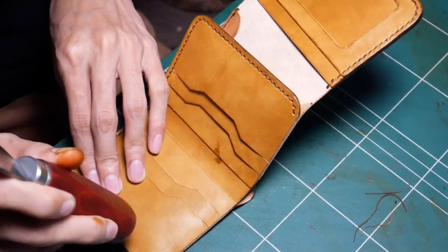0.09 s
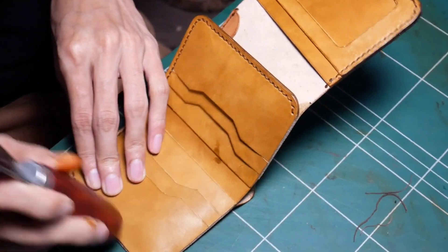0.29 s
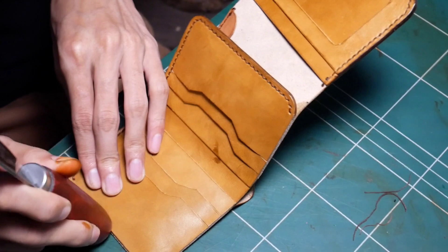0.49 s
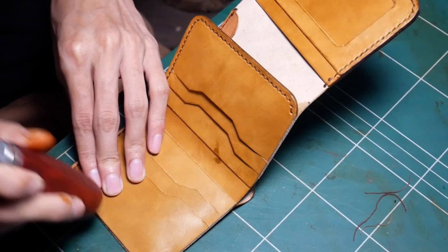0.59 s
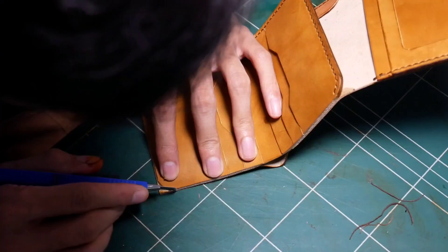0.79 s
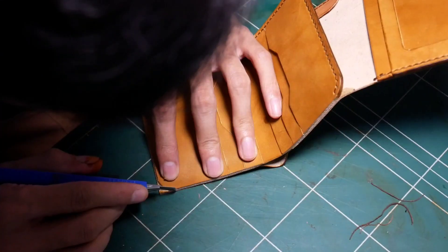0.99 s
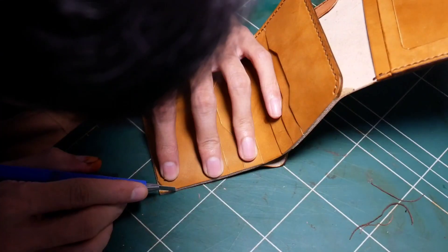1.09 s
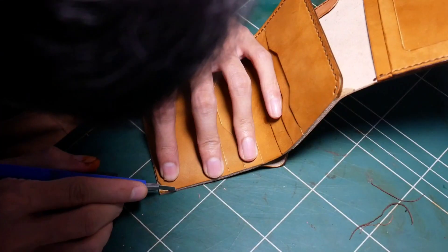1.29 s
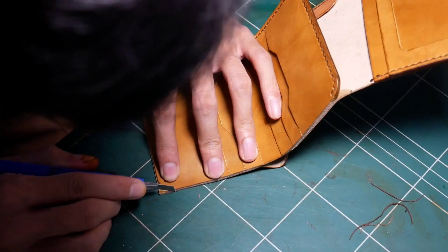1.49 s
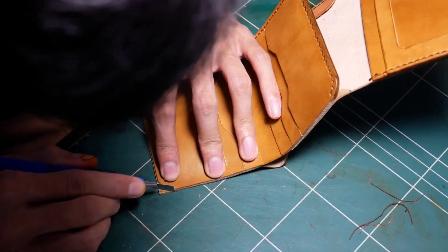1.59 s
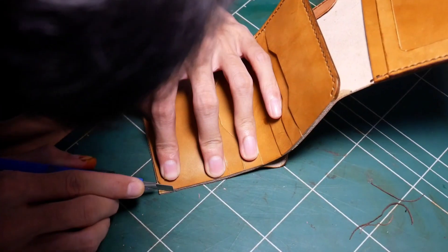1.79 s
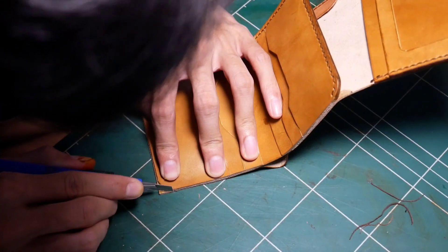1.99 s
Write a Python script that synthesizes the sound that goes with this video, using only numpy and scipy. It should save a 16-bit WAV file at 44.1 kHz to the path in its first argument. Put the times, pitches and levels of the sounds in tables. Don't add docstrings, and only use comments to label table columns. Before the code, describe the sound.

Heavy mallet knocks on a leather-covered bench, cut abruptly to faint edge-tool ticks and soft rubbing.

```python
import sys
import numpy as np
from scipy import signal
from scipy.io import wavfile

SR = 44100
rng = np.random.default_rng(int(sys.argv[2]) if len(sys.argv) > 2 else 0)


def dump_mix(stems):
    frames = np.atleast_2d(stems).T
    limited = np.clip(frames, -1, 1)
    pcm = np.round(limited * 32767).astype(np.int16)
    wavfile.write(sys.argv[1], SR, pcm)


def level_to_linear(level):
    exponent = np.asarray(level, float) / 20
    return 10 ** exponent


N = 88200
T = np.arange(N) / SR
SIDES = np.array([[1], [-1]])

# start in seconds, level in dB, tick pitch in Hz, tick level in dB, rattle in dB.
MALLET_BLOWS = [
    (-.064, -7.5, 2600, -12, -33),
    (0.2051, -6.5, 2700, -10, -33.5),
    (0.4727, -6, 1910, -14.5, -25.5),
]
# pitch in Hz, strength left, strength right, T60 in seconds.
HEAD_MODES = [(296.0, 1.42, 0.464, 0.025), (601.8, 0.372, 0.205, 0.07), (202.3, 0.396, 0.626, 0.07),
              (1244.0, -0.022, -0.056, 0.07), (955.3, -0.057, 0.03, 0.07), (416.0, -0.696, -0.297, 0.028)]
# frequency in Hz, likeness from 0 to 1.
BLOW_LIKENESS = [(60, 0.69), (180, 1), (550, 0.44), (1650, 0.64), (4970, 1), (15000, 0.22)]
AIR_LIKENESS = [(60, 0.26), (180, 0.13), (550, 0.02), (1650, 0.29), (4970, 1), (15000, 0.057)]
# frequency in Hz, left minus right in dB.
ROOM_LEAN = [(60, -4), (150, 2), (380, 4), (950, 0), (2380, -0.5), (5980, -4), (15000, -5)]
HEAD_GLIDE_CYCLES = 0.516
TICK_LEAD_S = 0.0005
RATTLE_LAG_S, RATTLE_RISE_S = 0.0079, 0.0019


def rms_one(x):
    return x / np.sqrt(np.mean(x ** 2) + 1e-20)


def at_hz(points, hz):
    table_hz, value = np.transpose(points)
    return np.interp(np.log(hz), np.log(table_hz), value)


def lean(hz):
    return at_hz(ROOM_LEAN, hz) / 2 * SIDES


def drift(rate):
    r = np.exp(-80 * np.pi * rate / SR)
    slow = signal.lfilter([1], [1, -2 * r, r * r], rng.standard_normal(N // 40 + 2002))[2000:]
    return np.interp(np.arange(N) / 40, np.arange(len(slow)), rms_one(slow))


def band_filter(order, low_hz, high_hz, x):
    return signal.sosfilt(signal.butter(order, [low_hz, high_hz], "band", fs=SR, output="sos"), x)


def high_pass(hz, x):
    return signal.sosfilt(signal.butter(2, hz, "high", fs=SR, output="sos"), x)


def bands(spectrum, likeness):
    edges = 28 * 2 ** np.arange(0, 9.3, .4)
    white = rng.standard_normal((2, 2, N + 4000))
    out = []
    for k, (low, high) in enumerate(zip(edges, edges[1:])):
        mid, side = band_filter(2, low, high, white[k % 2])[:, 4000:]
        hz = np.sqrt(low * high)
        alike = np.clip(at_hz(likeness, hz), 0, 1)
        stereo = np.sqrt(1 + alike) * mid + np.sqrt(1 - alike) * side * SIDES
        out.append((hz, level_to_linear(at_hz(spectrum, hz)) * stereo))
    total = np.sqrt(sum(np.mean(b ** 2) for _, b in out))
    return [(hz, b / total) for hz, b in out]


def resonant(hz, width):
    r = np.exp(-np.pi * width / SR)
    poles = [1, -2 * r * np.cos(2 * np.pi * hz / SR), r * r]
    mid, side = signal.lfilter([1, 0, -1], poles, rng.standard_normal((2, N)))
    return rms_one(mid + 1.01 * side * SIDES)


def steep_band(low_hz, high_hz, db):
    mid, side = band_filter(5, low_hz, high_hz, rng.standard_normal((2, N)))
    return level_to_linear(db) * rms_one(mid + 1.17 * side * SIDES)


def swell(s, rise, fall):
    u = np.maximum(T - s, 0)
    return (1 - np.exp(-u / rise)) * np.exp(-u / fall)


def wavelet(s, hz, width):
    return np.exp(-.5 * ((T - s) / width) ** 2) * np.cos(2 * np.pi * hz * (T - s))


def modes(s, table, rise_cycles, glide_cycles, tilt_db):
    longest_s = 0.31
    u = np.maximum(T - s, 0)
    out = 0
    for hz, left, right, t60 in table:
        turn = 2 * np.pi * (hz * u + glide_cycles * (1 - np.exp(-u / 0.00044)))
        grow = 1 - np.exp(-u * hz / rise_cycles)
        decay = level_to_linear(tilt_db * np.log2(hz / 300) - 60 * u / min(t60, longest_s))
        out = out + np.array([[left], [right]]) * (decay * grow * np.sin(turn))
    return out


def mallet_and_bench():
    # pitch in Hz, strength left, strength right, T60 in seconds.
    bench_modes = [(123.0, -0.12, -0.156, 0.372), (190.4, 0.113, 0.117, 0.173),
                   (218.2, -0.113, -0.124, 0.304), (242.5, -0.137, -0.114, 0.199),
                   (277.1, 0.116, 0.152, 0.268), (325.3, 0.433, 0.24, 0.08), (350.9, 0.186, 0.242, 0.247),
                   (391.8, 0.06, 0.024, 0.257), (452.2, 0.127, 0.09, 0.226), (482.8, 0.229, 0.01, 0.08),
                   (610.1, 0.154, 0.11, 0.159), (684.7, 0.155, 0.062, 0.08), (799.4, 0.05, 0.013, 0.182),
                   (949.8, -0.008, -0.002, 0.6)]
    tilts = [
        1.5,
        -0.14,
        -0.9,
    ]
    rings = [
        -6.5,
        0.9,
        0.7,
    ]
    contact_hz, bounce_s, bounce_db = 1620, 0.01024, -12.7
    out = 0
    for (s, db, tick_hz, tick_db, _), tilt_db, ring_db in zip(MALLET_BLOWS, tilts, rings):
        knock = modes(s, HEAD_MODES, 0.033, HEAD_GLIDE_CYCLES, 0)
        bounce = modes(s + bounce_s, HEAD_MODES, 0.05, HEAD_GLIDE_CYCLES, 0)
        ring = modes(s, bench_modes, 0.2, 0, tilt_db)
        struck = knock - level_to_linear(bounce_db) * bounce + ring
        soft = signal.lfilter(*signal.butter(1, contact_hz, fs=SR), struck)
        tick = level_to_linear(tick_db) * wavelet(s - TICK_LEAD_S, tick_hz, width=0.0005)
        out = out + level_to_linear(db + 6.5 + ring_db) * soft + tick
    return out


def contact_crack():
    snap = sum(swell(s - 2 * TICK_LEAD_S, rise=0.00019, fall=0.00073) for s, *_ in MALLET_BLOWS)
    return steep_band(940, 5900, db=-22) * snap


def room_tail():
    # frequency in Hz, level in dB per Hz.
    tail_spectrum = [(24, -72), (40, -36), (103, -10), (359, -2.5), (1080, -20), (2060, -20.5), (7520, -55),
                     (14000, -59.5), (15500, -54)]
    # frequency in Hz, T60 in seconds.
    tail_t60 = [(60, 0.74), (200, 0.3), (600, 0.47), (2000, 0.43), (6000, 0.68), (12000, 0.77)]
    early_db, early_s, early_from_hz = 17.5, 0.0054, 1700
    out = 0
    for hz, noise in bands(tail_spectrum, BLOW_LIKENESS):
        fall = at_hz(tail_t60, hz) / np.log(1000)
        rise = 0.0018 + 1.6 / hz
        early = level_to_linear(early_db) / (1 + (early_from_hz / hz) ** 4)
        shape = 0
        for s, db, *_ in MALLET_BLOWS:
            shape = shape + level_to_linear(db + 9) * (swell(s, rise, fall) + early * swell(s, rise, early_s))
        out = out + level_to_linear(-24 + lean(hz) + 2.9 * drift(29)) * shape * noise
    return out


def ringing_resonances():
    # pitch in Hz, width in Hz, level in dB, T60 in seconds.
    resonance_modes = [(192.3, 5.9, -35, 0.57), (469, 47, -34.5, 0.62), (6820, 160, -37, 0.1),
                       (7230, 320, -45, 0.47), (4000, 700, -40.5, 0.092), (8660, 820, -51.5, 0.42),
                       (2300, 130, -63, 0.32), (1970, 110, -55, 0.77), (2700, 85, -51.5, 0.31),
                       (3400, 130, -59, 0.17), (3756, 54, -51, 0.44), (11900, 450, -62, 0.16)]
    out = 0
    for hz, width, db, t60 in resonance_modes:
        fall = t60 / np.log(1000)
        shape = sum(level_to_linear(db + blow_db + 8.5) * swell(s + RATTLE_LAG_S, RATTLE_RISE_S, fall)
                    for s, blow_db, *_ in MALLET_BLOWS)
        out = out + resonant(hz, width) * shape
    return out


def tool_rattle():
    # frequency in Hz, level in dB per Hz.
    rattle_spectrum = [(1180, -38), (2000, 10.5), (4090, 8), (5980, -64), (6930, -9), (11500, 1.5),
                       (14500, -9), (15700, -37)]
    shaken = sum(level_to_linear(db + 5) * swell(s + RATTLE_LAG_S, RATTLE_RISE_S, fall=0.012)
                 for s, *_, db in MALLET_BLOWS)
    noise = sum(level_to_linear(lean(hz)) * b for hz, b in bands(rattle_spectrum, BLOW_LIKENESS) if hz > 1800)
    return shaken * noise


def edge_ticks():
    # start in seconds, peak in dB, pitch in Hz, tail level in dB.
    tick_events = [(.894, -48.5, 1920, -7.5), (1.292, -48.5, 2500, -8), (1.297, -48, 1770, -8),
                   (1.331, -42.5, 2370, -4), (1.335, -46.5, 1660, -14), (1.4218, -51, 3080, -2),
                   (1.503, -47, 1830, -8), (1.565, -42, 1830, -13), (1.663, -41.5, 1690, -19),
                   (1.6786, -26, 2690, -12.5), (1.72, -41.5, 1680, -17), (1.748, -42, 1900, -15),
                   (1.767, -43, 1800, -5), (1.768, -53, 2950, -22), (1.804, -42, 1860, -15),
                   (1.946, -24, 2620, -15.5)]
    peak_s, tail_s, pan_db = 0.001347, 0.0084, -1
    grain = rng.standard_normal((2, N)) * level_to_linear(4 * drift(250))
    tail = rms_one(band_filter(4, 2050, 3600, grain))
    tail = rms_one(tail[0] + 0.21 * tail)
    out = 0
    for s, db, hz, tail_db in tick_events:
        peak = wavelet(s + peak_s, hz, width=0.00046)
        tick = peak + level_to_linear(tail_db) * swell(s, 0.0012, tail_s) * tail
        out = out + level_to_linear(db + 0.5 + pan_db / 2 * SIDES) * tick
    tap_s, tap_db = 1.947, -34.5
    return out + level_to_linear(tap_db) * modes(tap_s, HEAD_MODES, 0.026, HEAD_GLIDE_CYCLES, 0)


def cloth_rubs():
    # start in seconds, length in seconds, level in dB.
    rub_events = [
        (0.879, 0.077, -61),
        (1.221, 0.019, -61),
        (1.288, 0.014, -53),
        (1.302, 0.054, -57.5),
        (1.373, 0.012, -56),
        (1.553, .02, -58),
        (1.9426, 0.013, -49.5),
    ]
    # frequency in Hz, level in dB per Hz.
    rub_spectrum = [(1500, 12), (4000, 2), (6000, -7.5), (9500, -5), (15000, -23)]
    stroke = sum(level_to_linear(db + 10.5) * swell(s, length / 6, length / 2) for s, length, db in rub_events)
    rough = level_to_linear(3 * drift(150)) * level_to_linear(3.5 * drift(400))
    return stroke * rough * sum(b for hz, b in bands(rub_spectrum, AIR_LIKENESS) if hz > 1300)


def far_motor():
    # time in seconds, pitch of the third order in Hz, load in dB.
    motor_course = [(0.72, 137.9, -43.5), (0.968, 138.0, -49.5), (1.164, 140.7, -54.5), (1.204, 140.9, -44),
                    (1.422, 140.9, -41), (1.66, 143.4, -50), (1.71, 144, -46.5), (1.91, 144.8, -47),
                    (2.0, 145.2, -38.5)]
    # order, level against the third in dB, share of the load followed.
    orders = [(2, -3, 0.093), (3, -0.5, 0.7), (4, -13, 0.17), (5, -13, 0.9)]
    s, third_hz, db = np.transpose(motor_course)
    turn = 2 * np.pi * np.cumsum(np.interp(T, s, third_hz) / 3) / SR
    mean_db = db.mean()
    load = np.interp(T, s, db) - mean_db
    out = 0
    for order, own_db, share in orders:
        level = level_to_linear(mean_db + 4.5 + own_db + share * load + 2.3 * drift(19))
        out = out + level * np.sin(order * turn + rng.uniform(0, 6.2) + 0.24 * drift(6.1))
    return out


def hammering_air():
    # frequency in Hz, level in dB per Hz.
    air_spectrum = [(40, -48), (120, -5.5), (200, -0.5), (470, -6), (1000, -15.5), (2600, -21), (5200, -44),
                    (15500, -47)]
    air = level_to_linear(-49) * sum(b for _, b in bands(air_spectrum, AIR_LIKENESS))
    return air + steep_band(56, 157, db=-70)


def edge_work_air():
    # frequency in Hz, level in dB per Hz.
    air_spectrum = [(70, 15), (300, 13), (700, 1.5), (1200, -4.5), (3200, -6.5), (5500, -25), (7300, -19.5),
                    (15500, -26.5)]
    # pitch in Hz, width in Hz, level in dB.
    hums = [(495, 28.6, -51), (466, 32, -53), (308.4, 19, -53.5), (258.2, 12.5, -53.5), (907, 5.9, -62.5)]
    # time in seconds, level in dB.
    traffic = [(0.72, -44), (0.908, -44), (1.832, -42), (2.0, -43.5)]
    s, db = np.transpose(traffic)
    lift = np.interp(T, s, db - db.mean())
    out = 0
    for hz, b in bands(air_spectrum, AIR_LIKENESS):
        band_lift = lift * 2.7 / (1 + hz / 2500)
        out = out + level_to_linear(band_lift + drift(13)) * b
    out = high_pass(100, level_to_linear(-46) * out)
    for hz, width, level_db in hums:
        out = out + level_to_linear(level_db + lift) * resonant(hz, width)
    return out + level_to_linear(lift) * steep_band(476, 903, db=-54)


def scene():
    change_s, fade_s = 0.708, 0.0099
    later = np.clip((T - change_s) / fade_s + .5, 0, 1)
    earlier = np.clip((change_s - T) / fade_s + .5, 0, 1)
    blows = mallet_and_bench() + contact_crack() + room_tail() + ringing_resonances() + tool_rattle()
    edge_work = edge_ticks() + cloth_rubs()
    return earlier * (blows + hammering_air()) + later * (edge_work + far_motor() + edge_work_air())


def top_cut(x):
    return signal.sosfilt(signal.butter(12, 15870, fs=SR, output="sos"), x)


def record(dry):
    heard = high_pass(92, dry)
    overloaded = heard / (1 + np.abs(heard) ** 8) ** (1 / 8)
    mix = signal.sosfilt(signal.cheby2(10, 50, 16100, fs=SR, output="sos"), overloaded)
    return top_cut(mix)


dry = scene()
out = record(dry)
dump_mix(out)
```